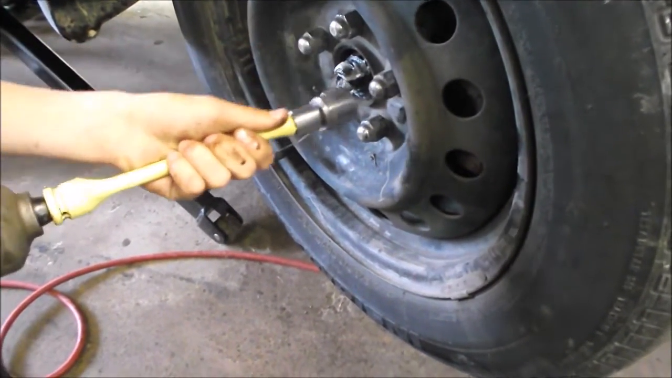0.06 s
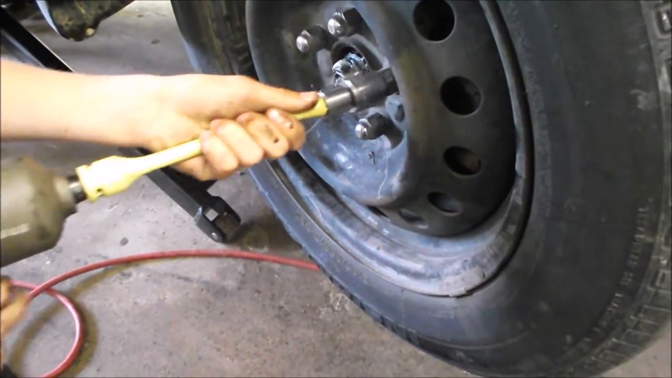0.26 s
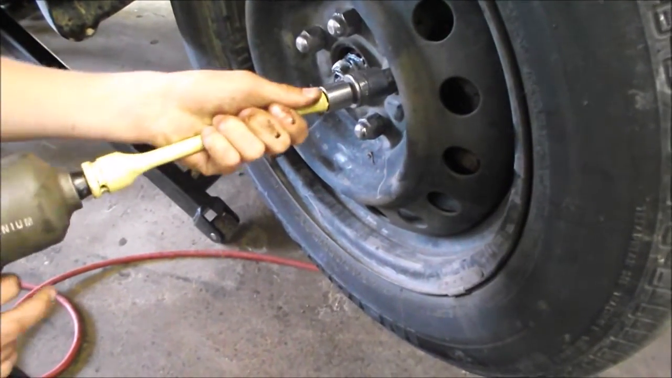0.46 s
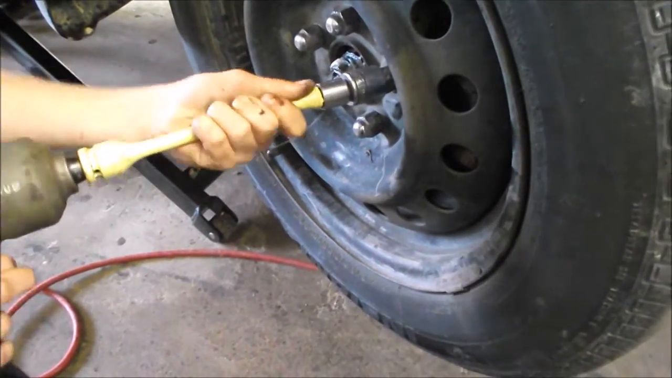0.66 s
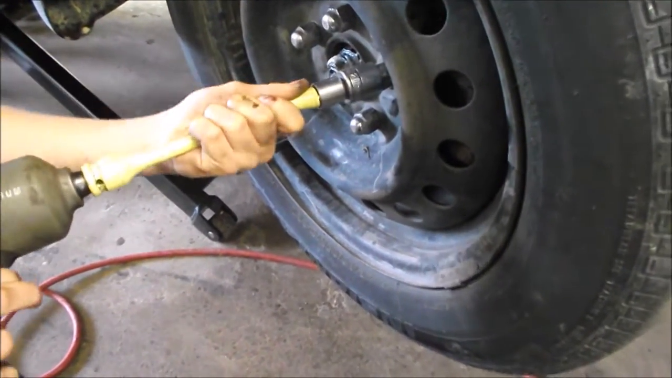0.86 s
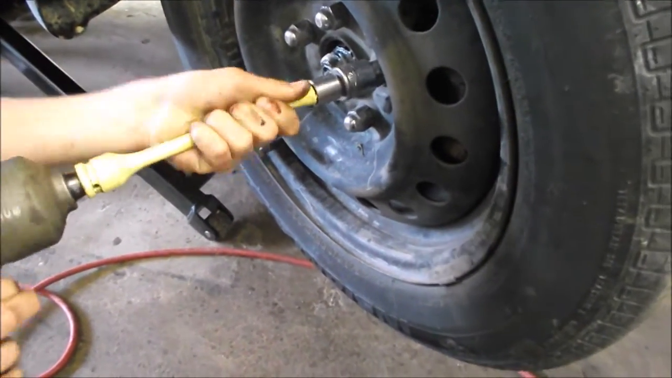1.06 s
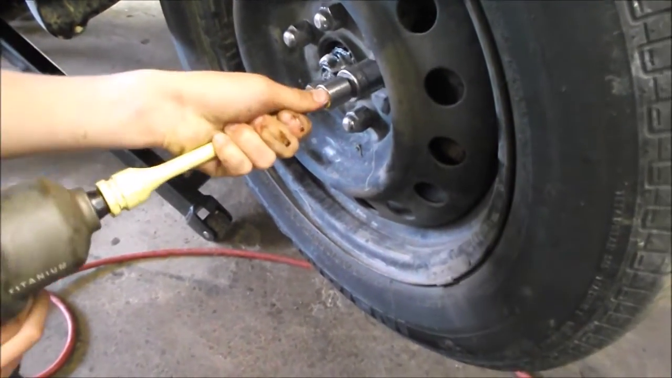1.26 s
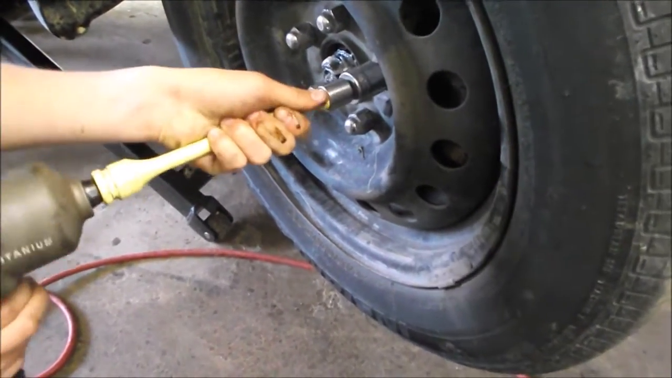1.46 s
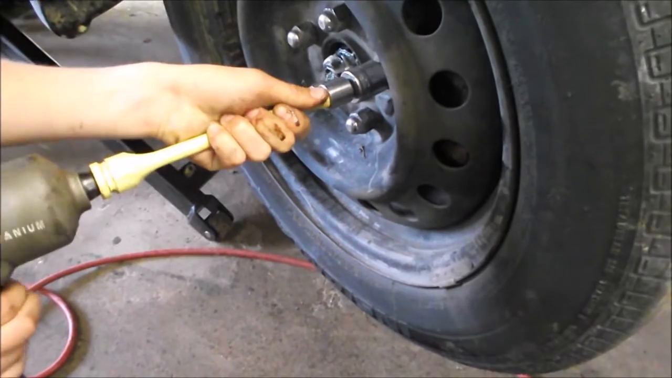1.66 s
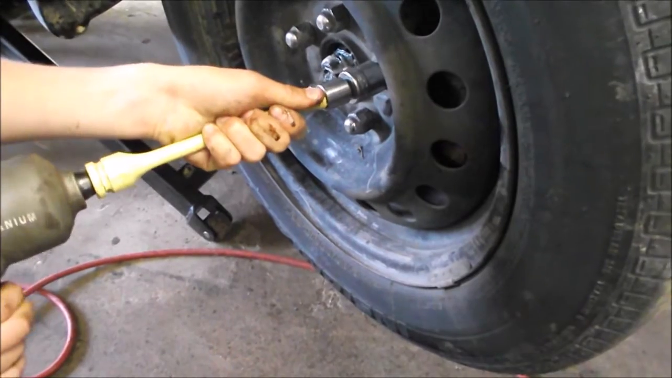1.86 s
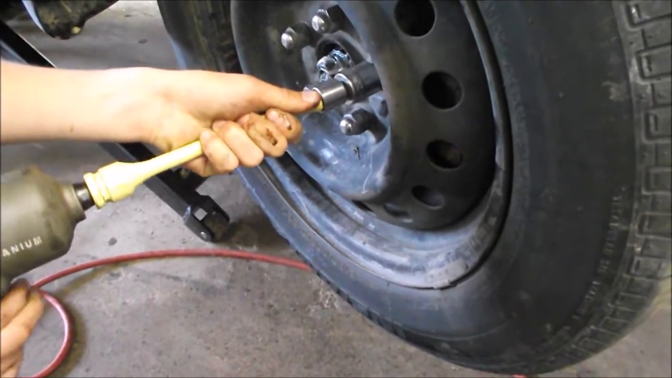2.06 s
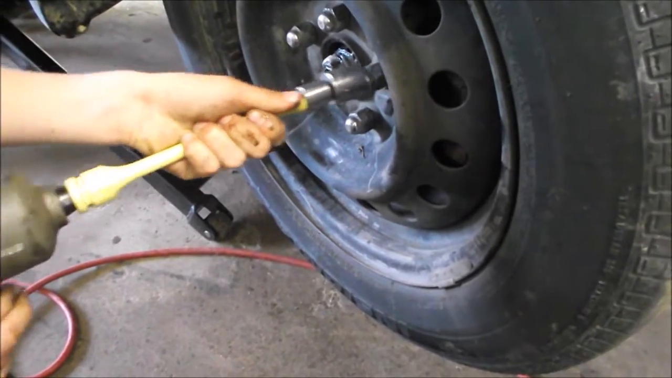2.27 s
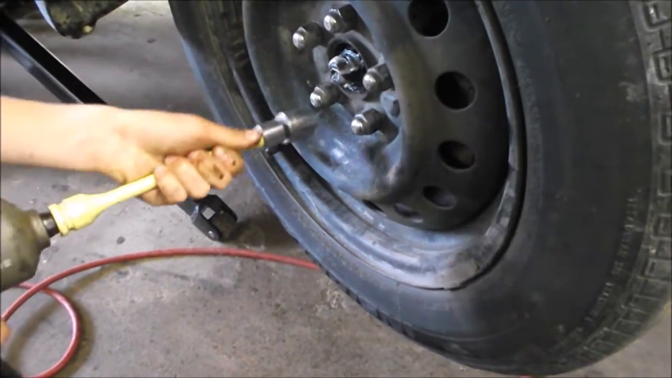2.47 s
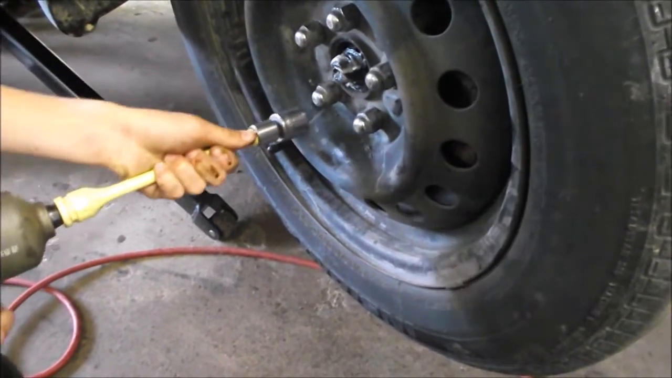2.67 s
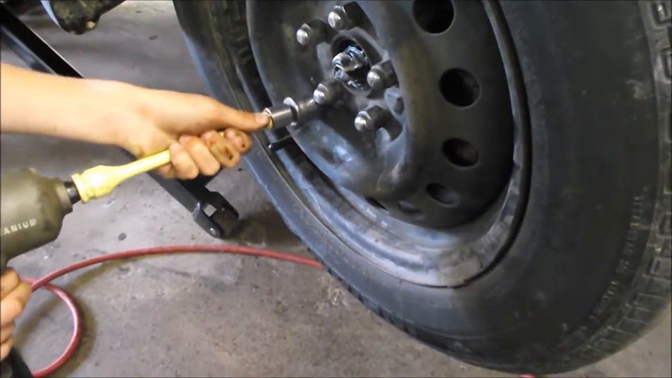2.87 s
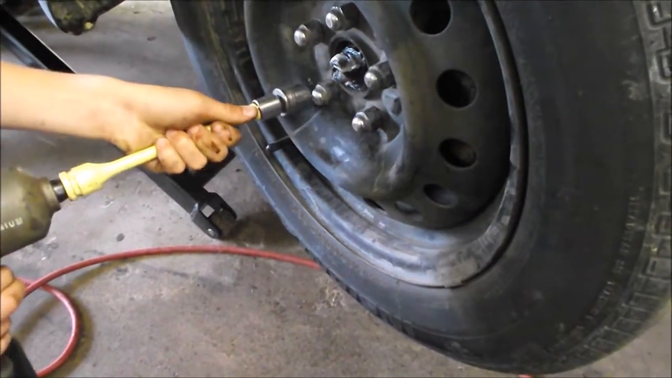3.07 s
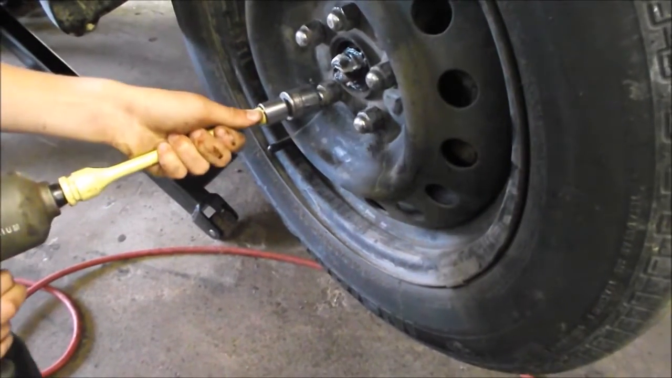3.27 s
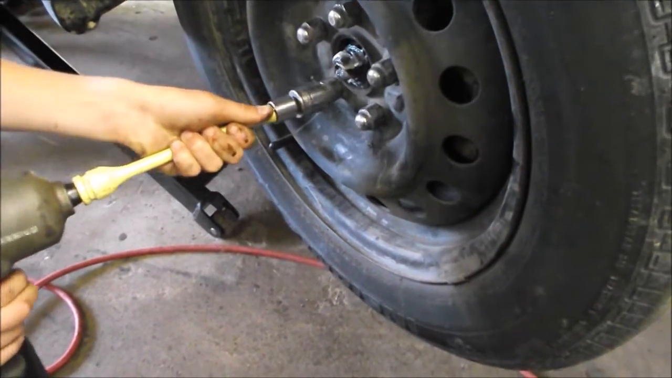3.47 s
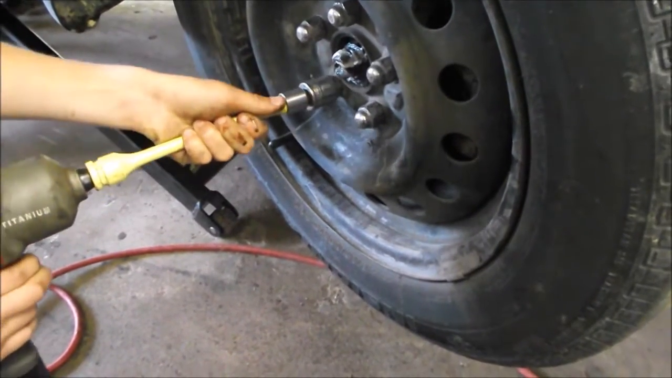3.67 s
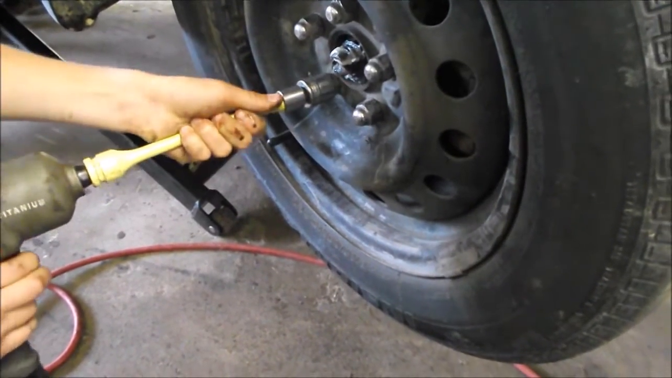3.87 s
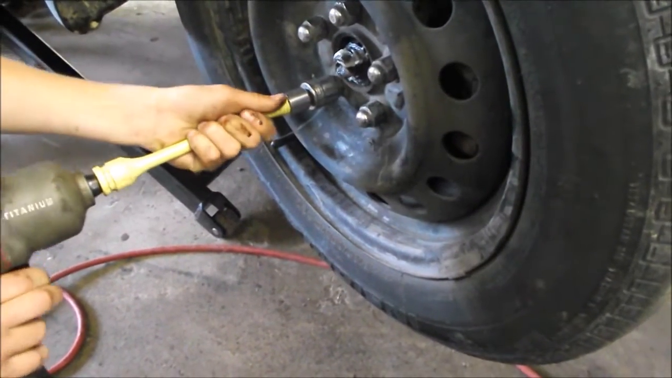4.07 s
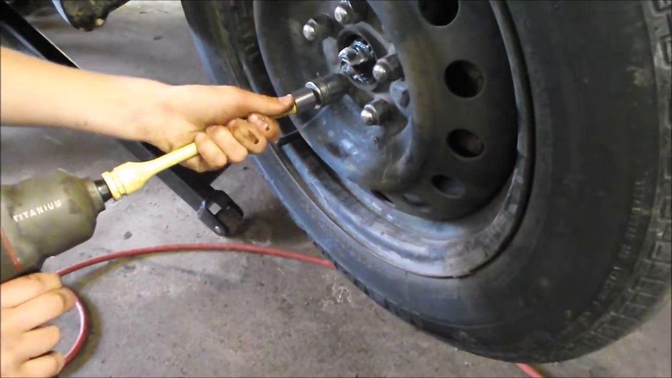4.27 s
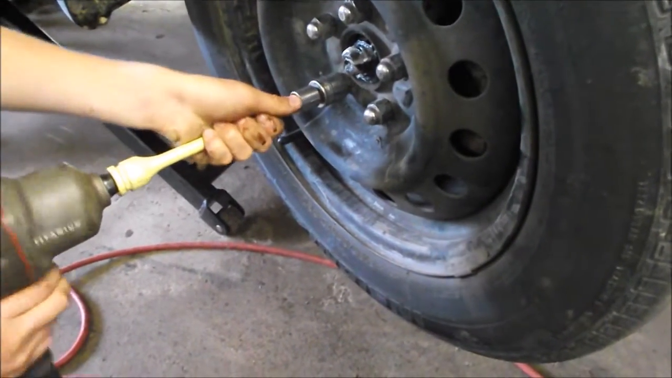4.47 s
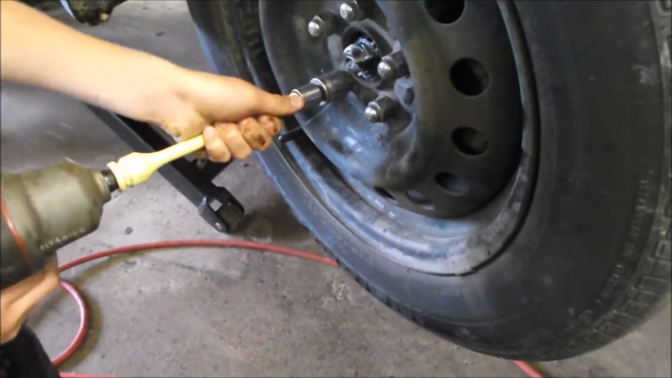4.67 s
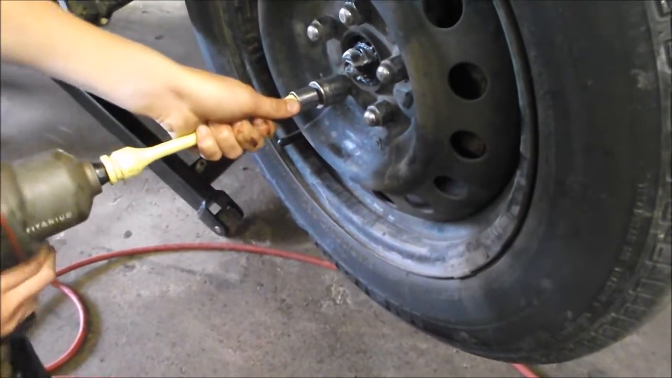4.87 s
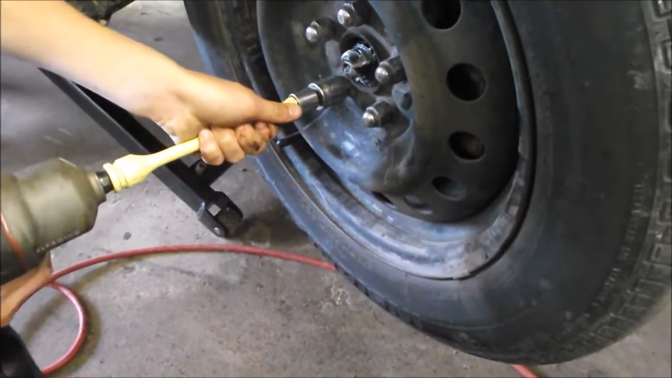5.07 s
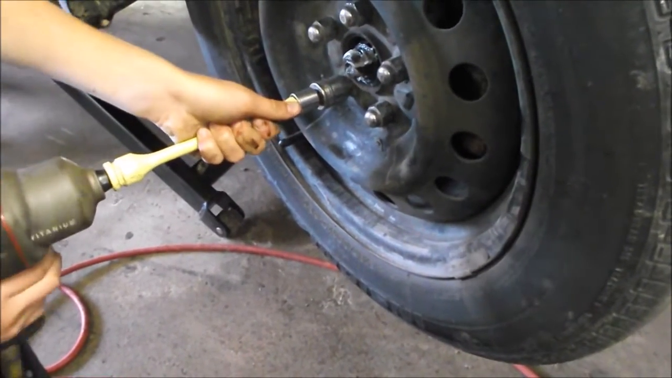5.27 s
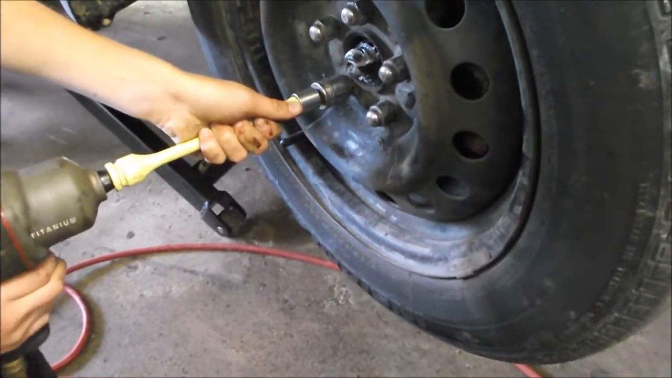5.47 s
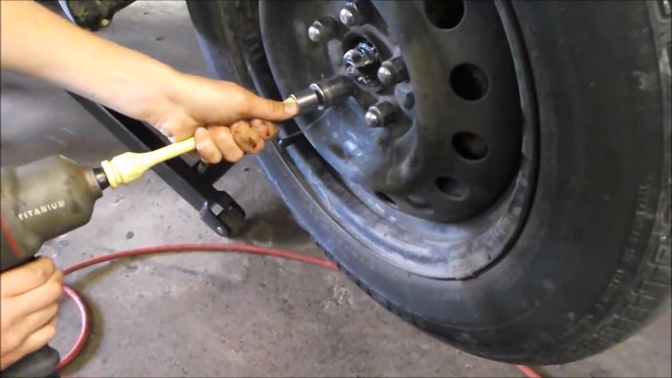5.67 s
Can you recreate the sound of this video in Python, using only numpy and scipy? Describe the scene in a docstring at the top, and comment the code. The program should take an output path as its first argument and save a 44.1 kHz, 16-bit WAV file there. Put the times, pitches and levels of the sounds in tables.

```python
"""A quiet garage with a thin whine; a socket and bar clank on the nuts and a steel wheel rings.
Then an air impact wrench bursts in: its vane motor puffs faster and faster until the hammer stalls it.
Metal is noise bursts through resonances plus decaying sines; puffs are clicks through resonances.
Air and room are coloured noise; the whine is steady sines. A small microphone hears it close up,
through a fast limiter."""
import sys
import numpy as np
from scipy import signal
from scipy.io import wavfile
from scipy.ndimage import uniform_filter1d

SR = 44100
rng = np.random.default_rng(int(sys.argv[2]) if len(sys.argv) > 2 else 0)


def master_out(mix):
    """Clip the mix to full scale and print it as 16-bit PCM to the path in sys.argv[1]."""
    frames = np.transpose(np.atleast_2d(mix))
    ceiling = np.clip(frames, -1, 1)
    pcm = np.round(ceiling * 32767).astype(np.int16)
    wavfile.write(sys.argv[1], SR, pcm)


def magnitude_from_level(level_db):
    """Linear magnitude for a level in decibels (20 dB per decade)."""
    exponent = np.asarray(level_db, float) / 20
    return 10 ** exponent


N = 251811

# room rumble, relative spectrum: hz, density_db
ROOM_SPECTRUM = [(12, -34), (20, -6), (64, 6.5), (93, -3), (126, -3.5), (334, -13.5), (363, -10.5),
                 (583, -13), (910, -10), (2930, -26.5), (7360, -29), (10000, -32.5), (10900, -32.5),
                 (11800, -33.5), (15600, -35)]
# steady high tones: hz, rms_db
WHINE_TONES = [(10530, -68), (10610, -60.5), (10691, -64.5), (10772, -77)]
# socket and bar on the nuts: start_s, level_db, crack_hz, ring_db, low_db, treble_db
CLANKS = [(0.2081, -8, 3230, -19, -5, 0.5), (0.2474, -16, 3200, -15, -1, -20),
          (0.263, -5, 3100, -24, -3, -8), (0.4355, -39.5, 3120, -6, -11, -26),
          (0.9572, -15, 2660, -30.5, 2, -10), (1.0333, -25, 2780, -19, -18, -18),
          (1.045, -24, 3400, -25, 1, -3), (1.066, -38, 3580, -22, 16, -10),
          (1.1031, -15, 3200, -18, 0.5, -15), (1.1464, 3, 3130, -16.5, -22, -18.5),
          (1.4692, -19.5, 2320, -24.5, 2, -11), (2.1551, -3.5, 3220, -25, -4, -4),
          (2.2501, -14, 3425, -21.5, 1, 1.5), (2.3854, -27, 2700, -21, -1, -18),
          (2.7738, -0.5, 2850, -23.5, -3.5, -6), (2.7903, -9.5, 2050, -2.5, -36, -62),
          (2.8636, -16, 4900, -39, -11, -1), (2.8885, -5.5, 3160, -22.5, -1, -4.5),
          (3.4068, -3.5, 3530, -25, -2.5, -34), (3.476, 10.5, 3720, -20, -11, -2.5),
          (3.484, -3.5, 5800, -17.5, -2, -18), (3.5249, -19, 3700, -8, -18, -20),
          (3.5496, -7.5, 3330, -20.5, -3, -5), (3.5921, -1, 3200, -15, -13.5, -30),
          (4.3034, -35, 2940, -24, -2, -6), (4.328, -36, 2540, -18, 3, -14),
          (4.5102, -33, 2710, -23, 4, -15), (4.5279, -34, 2290, -16, 0, -15)]
# rebounds, sounding like the clank before them: start_s, level_db
REBOUNDS = [(0.2128, -10), (0.2221, -8.5), (0.9617, -24.5), (1.1164, -12), (1.1297, -19.5), (1.1509, -5),
            (1.1594, -1), (1.191, -33), (2.2573, -20), (2.7785, -4), (2.783, -13.5), (3.4898, -11),
            (3.4964, -2), (3.552, -15), (3.5698, -13)]
# hammer blows that stall the motor: start_s, level_db
BLOWS = [(1.6362, 2), (1.726, 6), (1.8218, 8), (1.9244, 7), (5.5458, 9), (5.6366, 11)]
# cam lifting the hammer: start_s, level_db
CAM_LIFTS = [(1.6087, -1.5), (1.704, 8.5), (1.7958, 2), (1.8966, 6), (2.0304, 2.5), (5.5169, -1),
             (5.6096, 6), (5.7054, 0)]
# loose play in anvil and socket: start_s, level_db
LOOSE_PLAY = [(1.5853, 2), (1.8574, -11), (1.9394, -11), (2.0544, -8), (5.5644, 0), (5.6174, -19)]
# timbre of blow, cam lift and play: crack_hz, ring_db, low_db, treble_db
BLOW_TONE = (3800, -27, -14, -3)
CAM_TONE = (5200, -30, -8, -3)
PLAY_TONE = (2894, -27, 9, 1)
# steel wheel mode frequencies: hz
WHEEL_HZ = [1229, 1370, 2020, 2304, 2686, 2929, 3134, 3200, 3569, 3671, 3967, 4495, 5036, 5600, 5895, 6500,
            7450, 8030]
# steel wheel, one row per mode: level_db, t60_s
WHEEL_MODES = [(-3.5, 0.4), (14, 0.022), (-7, 0.15), (-15.5, 0.23), (-6.5, 0.096), (-9, 0.19), (-11, 0.67),
               (11, 0.024), (-3, .1), (-5, 0.35), (-2, 0.13), (-2, 0.13), (-1, 0.13), (13.5, 0.034),
               (7.5, 0.039), (2.5, 0.11), (-8, 0.099), (-0.5, 0.094)]
# garage decay: hz, t60_s
GARAGE_DECAY = [(200, 0.55), (1000, 0.53), (4000, 0.55), (12000, 0.23)]
# trigger valve snapping open and sucking the pressure down: open_s, suck_db, shut_s
VALVE_PULLS = [(1.5716, -2.5, 2.012), (5.47, 5, 6)]
# air hiss, relative spectrum: hz, density_db
HISS_SPECTRUM = [(880, -24), (1500, 1.5), (2170, -3), (3510, 7.5), (4310, 1), (6370, 3.5), (6960, -4.5),
                 (10800, -5), (15500, -29)]
# housing passages, relative levels: hz, half_width_hz, level_db
HISS_PASSAGES = [(2520, 270, 4), (4590, 130, -8), (6920, 200, 1), (9700, 56, -27)]
# low air roar, relative spectrum: hz, density_db
ROAR_SPECTRUM = [(24, -45), (40, -1.5), (200, -4), (266, 2), (378, -11), (463, -0.5), (538, -13),
                 (951, -2.5), (1120, 1), (1310, -2), (2200, -42), (2860, -54), (4840, -120)]
# motor runs, each speeding up until it stops: first_puff_s, stop_s, first_rate_per_s, puff_db
MOTOR_RUNS = [(1.5955, 1.633, 88, 3.5), (1.6689, 1.731, 66, 4.5), (1.769, 1.8165, 88, 4.5),
              (1.8673, 1.920, 86, 2), (5.4994, 5.545, 65, 5), (5.593, 5.633, 102, 6.5),
              (5.684, 5.708, 89, 0.5)]
# exhaust chamber and tyre, relative levels: hz, width_hz, level_db
PUFF_MODES = [(302, 200, 2), (473, 300, 5), (740, 330, -5.5), (1170, 155, -3.5)]
# low push at the first puff of each run: hz, width_hz, level_db (re puff_db)
LOW_PUSH = (125, 65, -2.5)
# long bar set ringing as the hammer lets go: hz, level_db, t60_s
BAR_MODES = [(1150, -18, .5), (2687, -22, .4), (3134, -22, 1.0), (3671, -10, .76), (6500, -23, .6)]

ROOM_RMS_DB = -41.5
RATTLE_LOOSE, RATTLE_HELD = .25, .04  # after-rattle share: loose socket, hammer under load
REBOUND_RING_DB = -12  # ring level of a rebound, re its clank
METAL_DELAY_S = .0009
METAL_TO_GARAGE_DB, PUFFS_TO_GARAGE_DB = -15, -13
HISS_DB, ROAR_DB = -12, -12  # full flow, before spin and choke
OPEN_DB_PER_S, SNAP_S = 625, .011  # leak swells under the trigger, the snap opens the rest
LEAK_HISS_DB, LEAK_ROAR_DB = -3.5, -6  # leak at the snap, re full flow
AIR_FADE_DB_PER_S = 118
SPIN_HISS_DB, SPIN_ROAR_DB = -9, -5  # change by the end of a motor run
CHOKE_S, CHOKE_SHARE = .008, .65  # flow dip at each blow
WHISTLE_OPENING, WHISTLE_OPEN = .75, .12  # power share of the whistle in the hiss
OPENING_S = .07
SPEEDUP_PER_S2 = 2850  # puff rate gained per second
BAR_FREE_S, BAR_RISE_S = 1.925, .06  # rings free after the last heavy blow of the first burst
LIMIT_DB, RECOVER_DB_PER_S = 2.5, 520


def evened(x):
    """Scales to rms 1."""
    return x / np.sqrt(np.mean(x ** 2) + 1e-20)


def read(points, hz):
    """Reads a curve on a log-frequency axis."""
    f, value = np.transpose(points)
    return np.interp(np.log(hz + 1), np.log(f + 1), value)


def add(mix, start_s, sound):
    """Mixes a sound in at start_s."""
    part = mix[round(start_s * SR):][:len(sound)]
    part += sound[:len(part)]


def resonate(x, hz, width_hz):
    """One-pole complex resonance, gain about 1 at its centre."""
    r = np.exp(-np.pi * width_hz / SR)
    pole = r * np.exp(2j * np.pi * hz / SR)
    return 2 * signal.lfilter([1 - r], [1, -pole], x).real


def noise(spectrum, patchy_db):
    """Coloured noise with random level patches over time and frequency, rms 1."""
    frames, hz = N // 256 + 5, np.fft.rfftfreq(1024, 1 / SR)
    a, b, patches = rng.standard_normal((frames, 513, 3)).T
    patches = uniform_filter1d(patches, size=12, axis=0)
    patches = evened(uniform_filter1d(patches, size=8, axis=1))
    z = (a + 1j * b) * magnitude_from_level(read(spectrum, hz)[:, None] + patchy_db * patches)
    return evened(signal.istft(z, nperseg=1024, noverlap=768)[1][:N])


def background():
    """Room rumble as coloured noise and a steady cluster of thin high sines."""
    t = np.arange(N) / SR
    whine = sum(np.sqrt(2) * magnitude_from_level(rms_db) * np.sin(2 * np.pi * (hz * t + rng.random()))
                for hz, rms_db in WHINE_TONES)
    return magnitude_from_level(ROOM_RMS_DB) * noise(ROOM_SPECTRUM, patchy_db=.4) + whine


def wheel_ring(crack_hz, low_db, treble_db):
    """Wheel modes as decaying sines; modes near the crack's centre are driven most."""
    t = np.arange(SR) / SR
    hz = np.array(WHEEL_HZ)[:, None]
    mode_db, t60_s = np.transpose(WHEEL_MODES)[:, :, None]
    max_loss_db = np.where(hz > crack_hz, -.5 * treble_db, 7)
    near_db = -np.minimum(200 * np.log2(hz / crack_hz) ** 2, max_loss_db)
    reach_db = np.where(hz < 2000, low_db, near_db)
    luck = rng.standard_normal((len(WHEEL_MODES), 2))
    scatter_db, phase = 1.5 * luck[:, :1], np.pi * luck[:, 1:]
    decay = magnitude_from_level(mode_db + reach_db + scatter_db - 60 * t / t60_s)
    rings = decay * np.sin(2 * np.pi * hz * t + phase)
    return rings.sum(0) * (1 - np.exp(-t / .00045))


def strike(level_db, crack_hz, ring_db, low_db, treble_db, rattle):
    """A noise burst of contacts through resonances, with the wheel's modes ringing on."""
    t = np.arange(4000) / SR
    onset = 1 - np.exp(-t / .00015)
    decay = np.exp(-t / .0009) + rattle * np.exp(-t / .008)
    contact = rng.standard_normal(4000) * onset * decay
    crack = resonate(resonate(contact, crack_hz, 1400), crack_hz, 2500)
    crack += 1.2 * resonate(resonate(contact, crack_hz, 340), crack_hz, 1800)  # short ping
    crack += magnitude_from_level(low_db) * resonate(resonate(contact, 1340, 450), 1180, 1900)
    crack += .062 * resonate(contact, 230, 880)  # dull knock of the tyre
    treble = resonate(resonate(contact, 8260, 2760), 9000, 4500)
    crack += magnitude_from_level(treble_db) * resonate(treble, 4500, 5000)
    out = magnitude_from_level(ring_db) * wheel_ring(crack_hz, low_db, treble_db)
    add(out, 0, .38 * crack / np.sqrt(np.mean(crack[:100] ** 2)))
    return magnitude_from_level(level_db) * out


def contacts():
    """Metal contacts: start_s, level_db, crack_hz, ring_db, low_db, treble_db, rattle."""
    rows = [(*row, RATTLE_LOOSE) for row in CLANKS]
    for start_s, level_db in REBOUNDS:
        _, _, hz, ring_db, low_db, treble_db = max(row for row in CLANKS if row[0] < start_s)
        rows.append((start_s, level_db, hz, ring_db + REBOUND_RING_DB, low_db, treble_db, RATTLE_LOOSE))
    for table, tone in ((BLOWS, BLOW_TONE), (CAM_LIFTS, CAM_TONE), (LOOSE_PLAY, PLAY_TONE)):
        rows += [(start_s, level_db, *tone, RATTLE_HELD) for start_s, level_db in table]
    return rows


def garage(x):
    """Sparse reflections of random sign, each band dying at its own speed."""
    taps = np.zeros(SR)
    at = np.arange(200, SR - 20, 20)
    taps[at + rng.integers(0, 20, len(at))] = rng.choice([-1., 1.], len(at))
    hz, t, z = signal.stft(taps, SR, nperseg=256)
    decay = magnitude_from_level(-60 * t / read(GARAGE_DECAY, hz)[:, None])
    tail = signal.istft(z * decay, SR, nperseg=256)[1]
    return signal.fftconvolve(x, tail / np.linalg.norm(tail))[:N]


def flow(leak_db):
    """Air gain over all trigger pulls: leak swells, valve snaps open, air fades once shut."""
    t, gain = np.arange(N) / SR, 0
    for open_s, _, shut_s in VALVE_PULLS:
        swell_db = OPEN_DB_PER_S * np.minimum(t - open_s, 0)
        snap_db = leak_db * np.clip(1 - (t - open_s) / SNAP_S, 0, 1)
        fade_db = -AIR_FADE_DB_PER_S * np.maximum(t - shut_s, 0)
        gain = gain + magnitude_from_level(swell_db + snap_db + fade_db)
    return gain


def hissing():
    """Turbulent noise with a whistle from the housing passages, strongest in thin flow."""
    t = np.arange(N) / SR
    hiss = noise(HISS_SPECTRUM, patchy_db=2.5)
    whistle = evened(sum(magnitude_from_level(level_db) * resonate(resonate(hiss, hz, 2 * half_width_hz), hz, 1100)
                         for hz, half_width_hz, level_db in HISS_PASSAGES))
    opening = sum((t > open_s - OPENING_S) & (t < open_s) for open_s, _, _ in VALVE_PULLS)
    share = uniform_filter1d(np.where(opening, WHISTLE_OPENING, WHISTLE_OPEN), size=600)
    hiss = np.sqrt(1 - share) * hiss + np.sqrt(np.clip(share, 0, 1)) * whistle
    flutter = evened(uniform_filter1d(rng.standard_normal(N), size=70))
    return hiss * evened(magnitude_from_level(2.4 * flutter))


def air():
    """Hiss and low roar that sink as the motor spins up and choke briefly at each blow."""
    t = np.arange(N) / SR
    spin = sum(np.clip((t - first_s) / (stop_s - first_s), 0, 1) * (t < stop_s)
               for first_s, stop_s, _, _ in MOTOR_RUNS)
    dips = sum(np.clip(2 - 4 * abs(t - blow_s - METAL_DELAY_S) / CHOKE_S, 0, 1) for blow_s, _ in BLOWS)
    hiss = hissing() * magnitude_from_level(HISS_DB + SPIN_HISS_DB * spin) * flow(LEAK_HISS_DB)
    roar = noise(ROAR_SPECTRUM, patchy_db=1.5) * magnitude_from_level(ROAR_DB + SPIN_ROAR_DB * spin) * flow(LEAK_ROAR_DB)
    return (1 - CHOKE_SHARE * dips) * (hiss + roar)


def exhaust():
    """Vanes dump puffs at a steadily climbing rate until the run stops; the valve kicks inward."""
    kicks = np.zeros(N)
    for open_s, suck_db, _ in VALVE_PULLS:
        kicks[round(open_s * SR)] -= magnitude_from_level(suck_db)
    k = np.arange(12)
    for first_s, stop_s, rate, puff_db in MOTOR_RUNS:
        # time of puff k under steady acceleration
        delay_s = (np.sqrt(rate ** 2 + 2 * SPEEDUP_PER_S2 * k) - rate) / SPEEDUP_PER_S2
        size = magnitude_from_level(puff_db + 3.75 * rng.standard_normal(12)) * (first_s + delay_s < stop_s)
        at = ((first_s - .0006 + delay_s) * SR).astype(int)
        np.add.at(kicks, np.minimum(at, N - 1), size)
    t = np.arange(1001) / SR
    click = sum(magnitude_from_level(level_db) * np.exp(-np.pi * width_hz * t) * np.sin(2 * np.pi * hz * t + .28)
                for hz, width_hz, level_db in PUFF_MODES)
    click = click * signal.windows.hann(2001)[1000:]
    click = signal.lfilter(*signal.butter(2, 170, "high", fs=SR), click)  # port radiates no steady flow
    return signal.oaconvolve(kicks, click / abs(click).max())[:N]


def thuds():
    """A low push at the first puff of each motor run, a decaying sine."""
    hz, width_hz, push_db = LOW_PUSH
    t, out = np.arange(2500) / SR, np.zeros(N)
    push = np.exp(-np.pi * width_hz * t) * np.sin(2 * np.pi * hz * t)
    for first_s, _, _, puff_db in MOTOR_RUNS:
        add(out, first_s - .001, magnitude_from_level(puff_db + push_db) * push)
    return out


def long_bar():
    """The freed bar's modes, swelling gently and dying as sines."""
    t = np.arange(2 * SR) / SR
    ring = sum(magnitude_from_level(level_db - 60 * t / t60_s) * np.sin(2 * np.pi * hz * t)
               for hz, level_db, t60_s in BAR_MODES)
    return (1 - np.exp(-t / BAR_RISE_S)) * ring


def scene():
    """All sources, with the garage answering the metal and the puffs."""
    metal = np.zeros(N)
    for start_s, *settings in contacts():
        add(metal, start_s + METAL_DELAY_S, strike(*settings))
    add(metal, BAR_FREE_S, long_bar())
    # gentle top rolloff of the small microphone on the metal
    metal = signal.lfilter(*signal.butter(1, 12000, fs=SR), metal)
    puffs = exhaust()
    echo = garage(magnitude_from_level(METAL_TO_GARAGE_DB) * metal + magnitude_from_level(PUFFS_TO_GARAGE_DB) * puffs)
    return (background() + metal + echo + air() + puffs + thuds())[None]


def band_limit(x):
    """A steep low-pass at the top of the band."""
    return signal.sosfilt(signal.butter(12, 15770, fs=SR, output="sos"), x)


def record(dry):
    """A peak limiter drops almost at once and recovers linearly in dB; low cut and hard ceiling."""
    peak_db = 20 * np.log10(abs(dry[0]) + 1e-9)
    fall_db = np.arange(N) * RECOVER_DB_PER_S / SR
    held_db = np.maximum.accumulate(peak_db + fall_db) - fall_db
    over_db = np.maximum(held_db - LIMIT_DB, 0)
    ducked = dry / magnitude_from_level(uniform_filter1d(over_db, size=15))
    ducked = signal.lfilter(*signal.butter(1, 25, "high", fs=SR), ducked)
    return band_limit(np.clip(ducked, -.97, .97))


dry = scene()
out = record(dry)
master_out(out)
```